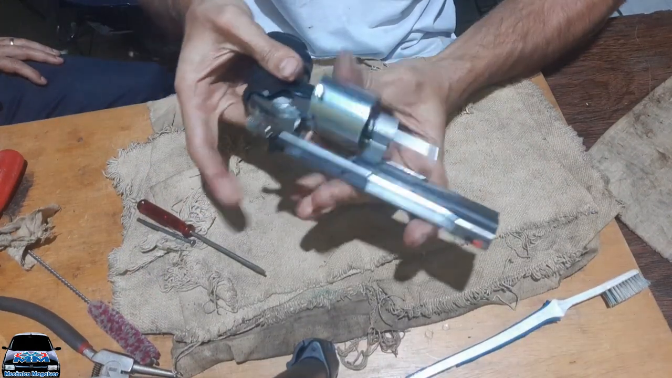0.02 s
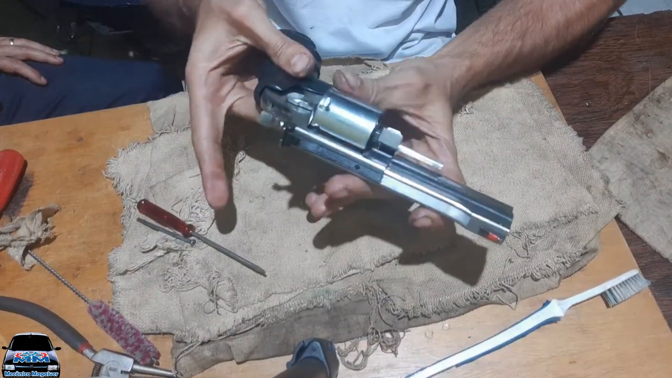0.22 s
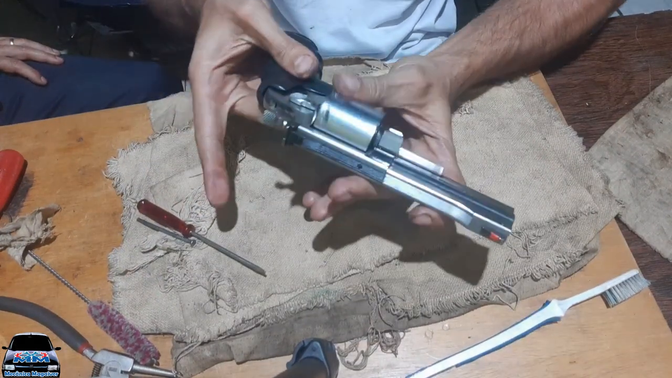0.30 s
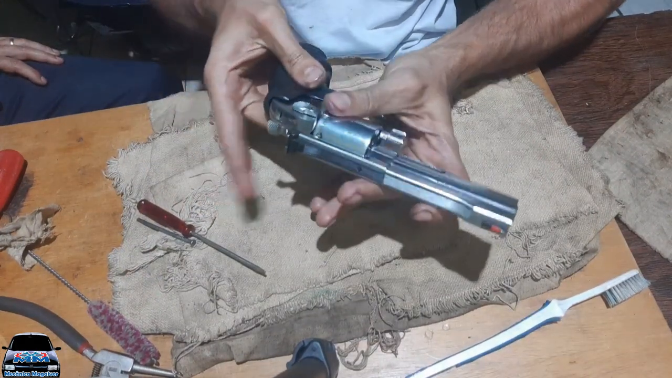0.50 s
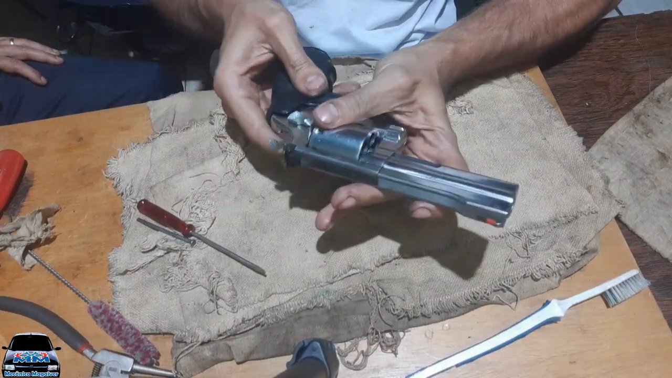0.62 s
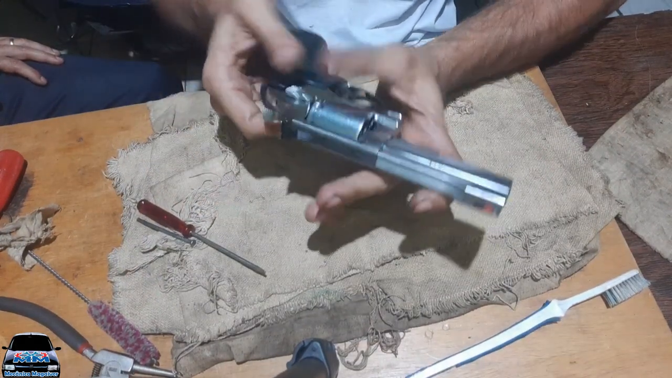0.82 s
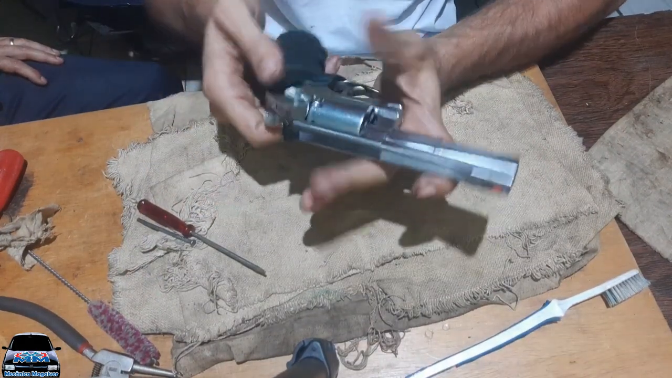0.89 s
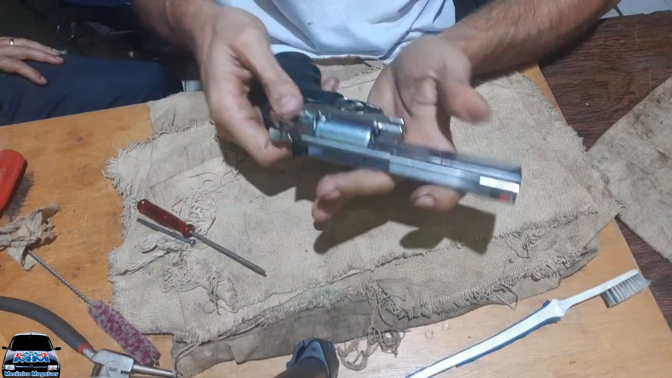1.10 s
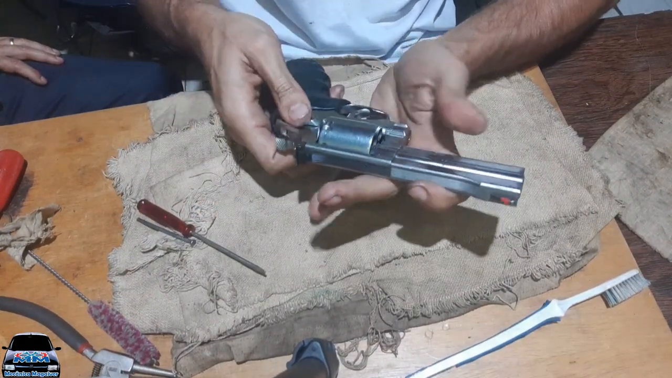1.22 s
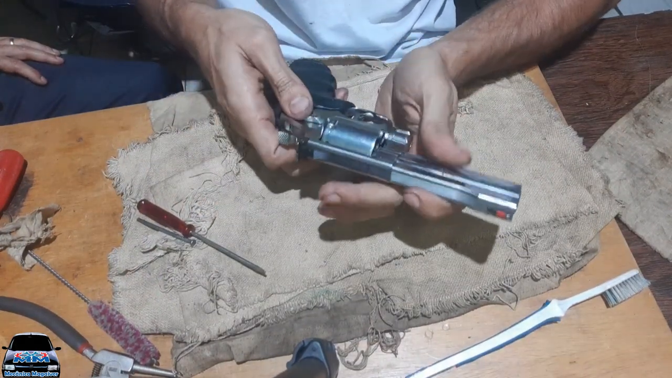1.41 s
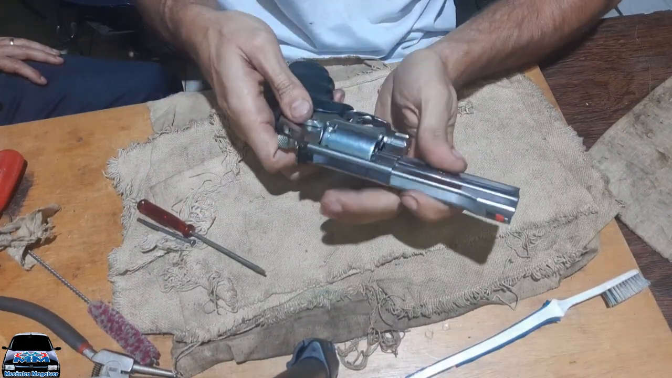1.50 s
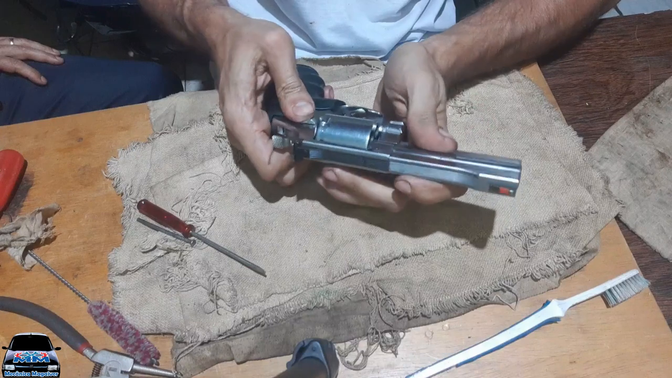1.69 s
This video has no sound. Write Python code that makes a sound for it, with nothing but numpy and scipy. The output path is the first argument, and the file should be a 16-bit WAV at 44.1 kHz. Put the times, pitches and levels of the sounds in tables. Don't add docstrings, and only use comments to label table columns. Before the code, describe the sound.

Close metallic revolver clicks at a workbench, first a hard cylinder latch, then a bright snap and a softer rattling click, followed by slight rubbing and ticks, with low hum and distant traffic in a live room.

```python
import sys
import numpy as np
from scipy import signal
from scipy.fft import rfft, irfft
from scipy.io import wavfile

SR = 44100
rng = np.random.default_rng(int(sys.argv[2]) if len(sys.argv) > 2 else 0)


def put_to_file(sound):
    columns = np.atleast_2d(sound).T
    safe = np.clip(columns, -1, 1)
    whole_steps = np.round(safe * 32767)
    wavfile.write(sys.argv[1], SR, whole_steps.astype(np.int16))


def voltage_ratio(decibels):
    exponent = np.asarray(decibels, float) / 20
    return 10 ** exponent


N = 74970

# centre_hz, density_db (per Hz)
HISS_SPECTRUM = [(130, -10.5), (250, -5), (450, -4), (1000, -7), (2000, -15.5), (4500, -25.5),
                 (9000, -26.5), (12000, -34), (15500, -37)]
# centre_hz, density_db (per Hz)
RUMBLE_SPECTRUM = [(12, -34), (20, 1.5), (86, 3), (126, 2), (178, -9.5), (200, -15), (260, -45),
                   (440, -120)]
# centre_hz, likeness (0 to 1; below 0 acts as 0)
BACKGROUND_LIKENESS = [(60, 1), (180, 0.73), (550, 0.49), (1650, -0.36), (4970, -0.01), (15000, -0.07)]
# time_s, level_db
TRAFFIC_SWELL = [(0, -0.5), (.3, 0.5), (.7, 5), (1.101, 3), (1.4, 1), (1.7, 0)]
HISS_DB, RUMBLE_DB = -66, -65
# time_s, pitch_hz, level_db
MOTOR_HUM = [(0.0, 95.5, -61.5), (0.184, 104.6, -80.5), (0.261, 99.7, -64.5), (0.368, 101.6, -63.5),
             (0.506, 98.5, -73), (0.709, 102.6, -60), (0.724, 102.4, -81), (0.756, 99.06, -65),
             (1.288, 99, -66), (1.406, 97.6, -90.5), (1.538, 92.2, -79.5), (1.7, 91, -90)]
HUM_FLUTTER_DB = 1.5

# start_s, level_db
LATCH_CONTACTS = [(0.2254, -24), (0.2257, -23), (0.2261, -22), (0.2268, -23), (0.2273, -25), (0.2279, -23),
                  (0.2288, -30), (0.2297, -31), (0.2312, -35), (0.2330, -40), (0.2390, -41)]
# start_s, level_db
PAWL_CONTACTS = [
    (0.4984, -38),
    (0.4988, -20),
    (0.4992, -24),
    (0.4996, -28),
    (0.5004, -31),
    (0.5016, -34),
    (0.5030, -37),
    (0.5055, -42),
]
# start_s, level_db
SEAR_CONTACTS = [
    (0.7157, -42),
    (0.7165, -32),
    (0.7170, -35),
    (0.7177, -27),
    (0.7184, -29),
    (0.7191, -29),
    (0.7204, -33),
    (0.7212, -38),
    (0.7221, -41),
]
# pitch_hz, level_db, t60_s
LATCH_MODES = [(600, -21.5, 0.012), (848, -17.5, 0.0079), (1054, -20.5, .012), (1481, -9.5, 0.042),
               (2000, -7, 0.017), (2323, -6, 0.024), (2660, -2, .012), (3130, -6.5, 0.02),
               (4118, -2, 0.016), (4600, -1.5, 0.0062), (5280, -4, 0.009), (6070, 0, 0.0027),
               (7600, -2.5, 0.0054), (9600, -11, 0.0028)]
PAWL_MODES = [(500, -22, 0.05), (785, -19, 0.0085), (1127, -21, 0.022), (1500, -17, 0.023),
              (2370, -6.5, 0.0077), (3343, -15.5, 0.01), (4200, -2, 0.0073), (4490, -8.5, 0.0034),
              (5568, 0, 0.007), (5980, -1, 0.0057), (7510, 0, 0.0055), (9060, -3.5, 0.0049),
              (10950, -18.5, 0.00427), (14100, -10, 0.0032)]
SEAR_MODES = [(490, -28.5, 0.05), (774.7, -17, 0.016), (1200, -31, 0.0056), (1440, -7, 0.01),
              (1910, -13, 0.0043), (2450, -14, 0.0098), (3240, -8, 0.017), (4200, -2, 0.013),
              (5800, 3, 0.01), (8080, 2, 0.00379), (9320, -1.5, 0.0055), (10520, -3.5, 0.009),
              (11600, -7.5, 0.006), (13600, -9, 0.004)]
# level_db, crack_db, crack_low_hz, crack_high_hz, room_db
CLICK_BALANCE = [
    (-3, -3, 890, 17000, -10),
    (-1.5, -0.5, 4000, 8800, -14.5),
    (-1, 3, 2930, 9700, -14),
]
CRACK_S, CRACK_LIKENESS, SMALL_BODY_HZ = 0.00035, 0.1, 450
ROOM_DAMPING, ROOM_CRACK_DB = 0.54, 9
PAN_DB, LEFT_LEAD_S, PATH_SPREAD_S = 1.5, 0.00004, 0.00003
# start_s, pitch_hz, level_db, t60_s
FREE_RINGS = [
    (0.228, 1524, -58, .9),
    (0.228, 4100, -56.5, 0.35),
    (0.228, 7687, -51, .3),
    (0.502, 618, -64, 1.7),
    (0.502, 500, -50.5, 0.042),
    (0.719, 490, -58, .04),
    (0.5, 4100, -83, .4),
    (0.5, 5750, -73, 0.391),
    (0.72, 4200, -61, 0.22),
    (0.72, 5800, -79.5, .35),
]

# start_s, length_s, level_db
TOUCHES = [
    (0.484, 0.011, -51),
    (0.705, 0.00524, -54),
    (1.062, 0.034, -66.5),
    (1.263, 0.029, -80),
    (1.461, 0.027, -75),
    (0.822, 0.47, -73.5),
    (0.974, 0.0078, -72),
]
# pitch_hz, level_db, t60_s
TOUCH_MODES = [(1000, -5, 0.00649), (1740, -5, 0.0051), (2020, -9.5, 0.0035), (2679, -0.5, 0.0018),
               (3970, -5, 0.0025), (5500, -7, .0015), (7000, -9.5, .0015), (9200, -9, 0.0015)]
GRAINS_PER_S, TOUCH_ROOM_DB = 4000, -10.5
# start_s, pitch_hz, level_db
LOOSE_TICKS = [
    (0.4892, 1680, -46),
    (0.4912, 1640, -47.5),
    (0.9746, 3200, -54),
    (0.976, 8000, -58),
    (1.054, 2510, -58),
    (1.0690, 2480, -56.5),
    (1.0743, 3400, -57.5),
    (1.078, 2707, -65),
    (1.090, 3020, -61),
]
TICK_CYCLES = 22

# centre_hz, t60_s
ROOM_T60 = [(300, 1.4), (800, .5), (2000, 0.85), (5000, .5), (9000, 0.6042), (15000, 0.24)]
# centre_hz, level_db
ROOM_COLOUR = [(300, -4.5), (800, -1), (2000, 0), (5000, 1), (9000, 1), (15000, 4)]
# centre_hz, likeness (0 to 1)
ROOM_LIKENESS = [(300, .7), (700, .35), (1200, 0.12), (15000, 0.08)]
FIRST_ECHO_S, ROOM_FILL_S, SECOND_DB, SECOND_STRETCH = 0.0013, 0.004, -14.5, 0.8

# start_s, length_s, pitch_hz, width_hz, level_db
FAR_TONES = [
    (1.121, 0.55, 1215, 220, -73.5),
    (1.3, 0.31, 1300, 83, -88),
    (1.57, .25, 450, 110, -75.5),
    (1.5, 0.12, 527, 40, -69.5),
    (0.96, 0.46, 100, 9.2, -77.5),
    (0.702, 0.23, 1100, 110, -88),
]
FAR_EDGE_S, FAR_LIKENESS = 0.026, 0.28
# time_s, pitch_hz, level_db
HIGH_WHINE = [
    (1.17, 1250, -88),
    (1.21, 1255, -72.5),
    (1.3, 1230, -70.5),
    (1.37, 1235, -94),
    (1.395, 1120, -75.5),
    (1.43, 1235, -74),
    (1.52, 1190, -74.5),
    (1.6, 1150, -81.5),
    (1.67, 1200, -76.5),
]
LOW_WHINE = [
    (1.5, 450, -79.5),
    (1.53, 468, -65),
    (1.6, 432, -74.5),
    (1.635, 481, -70),
    (1.7, 435, -75.5),
]
WHINE_FLUTTER_DB, WHINE_WOBBLE_HZ = 3.5, 20

# centre_hz, difference_db
PORT_BALANCE = [(700, 0), (2500, -1.5), (6000, 0), (9000, 5), (15000, 1)]
TOP_HZ, EDGE_HZ = 15000, 16700


def rms_one(x):
    return x / np.sqrt(np.mean(x ** 2) + 1e-20)


def at_hz(points, hz):
    centre_hz, value = np.transpose(points)
    return np.interp(np.log(hz), np.log(centre_hz), value)


def drift(rate_hz):
    pole = np.exp(-2 * np.pi * rate_hz * 40 / SR)
    white = rng.standard_normal(N // 40 + 2002)
    slow = signal.lfilter([1], [1, -2 * pole, pole * pole], white)[2000:]
    return np.interp(np.arange(N) / 40, np.arange(len(slow)), rms_one(slow))


def impulse(start_s):
    return 1.0 * (np.arange(N) == int(start_s * SR))


def ring(force, hz, t60):
    radius, angle = voltage_ratio(-60 / (t60 * SR)), 2 * np.pi * hz / SR
    poles = [1, -2 * radius * np.cos(angle), radius * radius]
    return signal.lfilter([0, np.sin(angle)], poles, force + 1e-18)


def pair(white, alike):
    alike = np.clip(alike, 0, 0.99)
    shared, opposed = white
    return np.sqrt(1 + alike) * shared + np.sqrt(1 - alike) * opposed * [[1], [-1]]


def bands():
    edges = 20 * 2 ** np.arange(0, 9.8, 1 / 3)
    white = rng.standard_normal((2, 2, N))
    for k, (low, high) in enumerate(zip(edges, edges[1:])):
        band = signal.butter(2, [low, high], "band", fs=SR, output="sos")
        yield np.sqrt(low * high), signal.sosfilt(band, white[k % 2])


def background():
    hiss, rumble = 0, 0
    swell_db = np.interp(np.arange(N) / SR, *np.transpose(TRAFFIC_SWELL))
    for hz, noise in bands():
        flicker = voltage_ratio(0.67 * drift(2.7))
        both = pair(noise, at_hz(BACKGROUND_LIKENESS, hz)) * flicker
        if hz > 160:
            hiss = hiss + voltage_ratio(at_hz(HISS_SPECTRUM, hz) + swell_db * (hz < 1500)) * both
        else:
            rumble = rumble + voltage_ratio(at_hz(RUMBLE_SPECTRUM, hz) + swell_db) * both
    return voltage_ratio(HISS_DB) * rms_one(hiss) + voltage_ratio(RUMBLE_DB) * rms_one(rumble)


def motor_hum():
    time_s, pitch_hz, level_db = np.transpose(MOTOR_HUM)
    t = np.arange(N) / SR
    phase = 2 * np.pi * np.cumsum(np.interp(t, time_s, pitch_hz)) / SR
    level = voltage_ratio(np.interp(t, time_s, level_db) + HUM_FLUTTER_DB * drift(9.3))
    return np.sqrt(2) * level * np.sin(phase)


def click(contacts, modes, crack_db, low_hz, high_hz):
    start_s, level_db = np.transpose(contacts)
    path = rng.standard_normal((len(contacts), len(modes), 2))
    sign = rng.choice([-1, 1], (len(contacts), len(modes)))
    out, unit = np.zeros((3, N)), impulse(0)
    total = np.sqrt(np.sum(voltage_ratio(level_db) ** 2))
    band = signal.butter(2, [low_hz, high_hz], "band", fs=SR, output="sos")
    room_crack = voltage_ratio(crack_db + ROOM_CRACK_DB) * rfft(signal.sosfilt(band, unit + 1e-18))
    power = abs(room_crack) ** 2
    for k, (hz, mode_db, t60) in enumerate(modes):
        strikes = np.zeros((2, N))
        for side in (0, 1):
            at = (start_s + side * LEFT_LEAD_S + PATH_SPREAD_S * path[:, k, side]) * SR
            strikes[side, at.astype(int)] = sign[:, k] * voltage_ratio(level_db)
        mode_rms = total * voltage_ratio(mode_db) * np.std(ring(unit, hz, t60))
        out[:2] += mode_rms * rms_one(ring(strikes, hz, t60))
        power += abs(voltage_ratio(mode_db) * rfft(ring(unit, hz, t60 * ROOM_DAMPING))) ** 2
    hits = np.zeros(N)
    hits[(start_s * SR).astype(int)] = voltage_ratio(level_db + crack_db)
    crack_envelope = signal.lfilter([1], [1, -np.exp(-1 / (CRACK_S * SR))], hits)
    crack = crack_envelope * pair(rng.standard_normal((2, N)), CRACK_LIKENESS)
    out[:2] += signal.sosfilt(band, crack + 1e-18)
    loudest_s = start_s[np.argmax(level_db)]
    out[2] = total * np.roll(irfft(np.sqrt(power), N), int(loudest_s * SR))
    small_body = signal.butter(6, SMALL_BODY_HZ, "high", fs=SR, output="sos")
    return signal.sosfilt(small_body, out)


def free_rings():
    return sum(voltage_ratio(db) * ring(impulse(s), hz, t60) for s, hz, db, t60 in FREE_RINGS)


def rustle():
    t, effort, out = np.arange(N) / SR, 0, 0
    for start_s, length_s, db in TOUCHES:
        effort = effort + voltage_ratio(db) * np.sin(np.pi * np.clip((t - start_s) / length_s, 0, 1))
    for hz, db, t60 in TOUCH_MODES:
        grains = (rng.random((2, N)) < GRAINS_PER_S / SR) * rng.standard_normal((2, N))
        out = out + voltage_ratio(db) * ring(effort * grains, hz, t60)
    return out


def ticks():
    return sum(voltage_ratio(db) * ring(impulse(s), hz, TICK_CYCLES / hz) for s, hz, db in LOOSE_TICKS)


def room_response():
    t = np.maximum(np.arange(N) / SR - FIRST_ECHO_S, 0)
    out = 0
    for hz, noise in bands():
        fall_db = -60 * t / at_hz(ROOM_T60, hz)
        decay = voltage_ratio(fall_db) + voltage_ratio(SECOND_DB + fall_db / SECOND_STRETCH)
        out = out + voltage_ratio(at_hz(ROOM_COLOUR, hz)) * decay * pair(noise, at_hz(ROOM_LIKENESS, hz))
    return out * (1 - np.exp(-t / ROOM_FILL_S)) / np.sqrt(SR / 20)


def revolver():
    direct = rustle() + ticks()
    send = voltage_ratio(TOUCH_ROOM_DB) * direct[0]
    all_contacts = (LATCH_CONTACTS, PAWL_CONTACTS, SEAR_CONTACTS)
    all_modes = (LATCH_MODES, PAWL_MODES, SEAR_MODES)
    for contacts, modes, balance in zip(all_contacts, all_modes, CLICK_BALANCE):
        db, crack_db, low_hz, high_hz, room_db = balance
        x = voltage_ratio(db) * click(contacts, modes, crack_db, low_hz, high_hz)
        direct = direct + x[:2]
        send = send + voltage_ratio(room_db) * x[2]
    direct = direct + free_rings()
    pan = voltage_ratio([[PAN_DB / 2], [-PAN_DB / 2]])
    return direct * pan + signal.fftconvolve(send[None], room_response(), axes=1)[:, :N]


def far_tones():
    t, out = np.arange(N) / SR, 0
    for start_s, length_s, hz, width_hz, db in FAR_TONES:
        noise = pair(rng.standard_normal((2, N)), FAR_LIKENESS)
        t60 = 2.2 / width_hz
        tone = ring(ring(noise, hz, t60), hz, t60)
        fade = np.clip(np.minimum(t - start_s, start_s + length_s - t) / FAR_EDGE_S, 0, 1)
        out = out + voltage_ratio(db) * rms_one(tone) * fade
    return out


def whine(course):
    time_s, pitch_hz, level_db = np.transpose(course)
    t = np.arange(N) / SR
    phase = 2 * np.pi * np.cumsum(np.interp(t, time_s, pitch_hz) + WHINE_WOBBLE_HZ * drift(25)) / SR
    flutter_db = WHINE_FLUTTER_DB * np.array([drift(30), drift(30)])
    level = voltage_ratio(np.interp(t, time_s, level_db, -120, -120) + flutter_db)
    port_phase = 0.5 * np.array([drift(8), drift(8)])
    return np.sqrt(2) * level * np.sin(phase + port_phase)


def scene():
    near = revolver()
    far = background() + motor_hum() + far_tones() + whine(HIGH_WHINE) + whine(LOW_WHINE)
    return near + far


def band_limit(x):
    return signal.sosfilt(signal.butter(12, 16460, fs=SR, output="sos"), x)


def record(dry):
    tilt_db = at_hz(PORT_BALANCE, np.fft.rfftfreq(N, 1 / SR) + 1) / 2
    ports = irfft(rfft(dry) * voltage_ratio([tilt_db, -tilt_db]), N)
    roll_off = signal.butter(4, TOP_HZ, fs=SR, output="sos")
    cut = signal.cheby2(10, 50, EDGE_HZ, fs=SR, output="sos")
    return band_limit(signal.sosfilt(np.vstack([roll_off, cut]), ports))


dry = scene()
out = record(dry)
put_to_file(out)
```